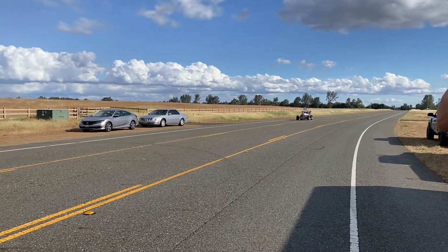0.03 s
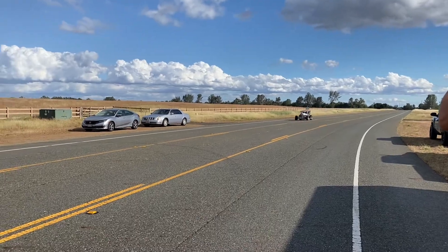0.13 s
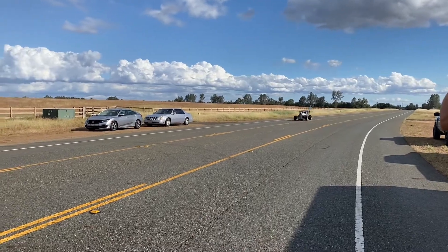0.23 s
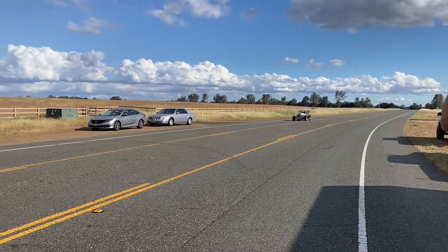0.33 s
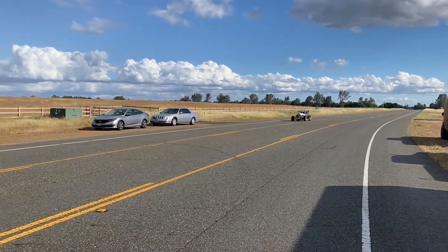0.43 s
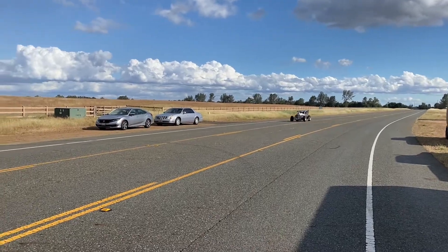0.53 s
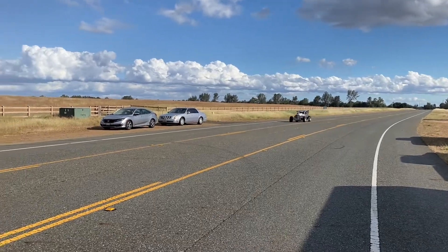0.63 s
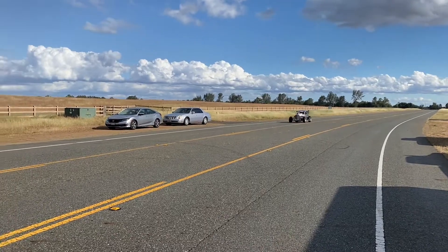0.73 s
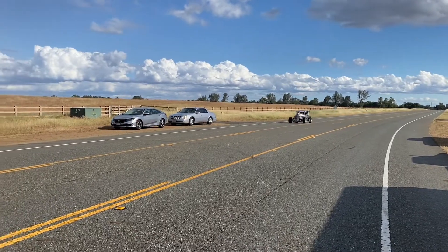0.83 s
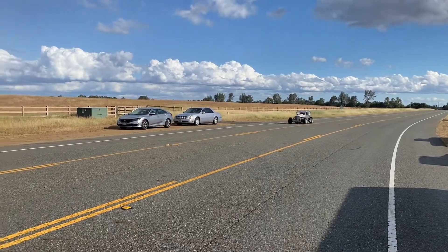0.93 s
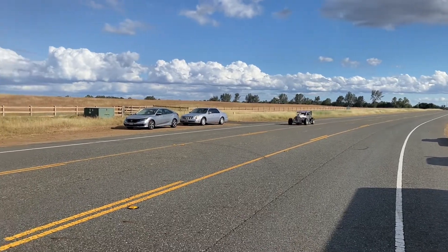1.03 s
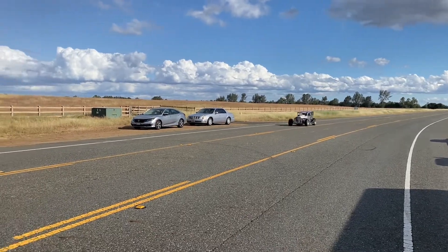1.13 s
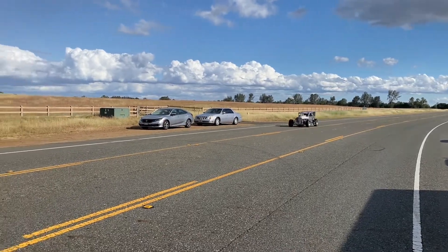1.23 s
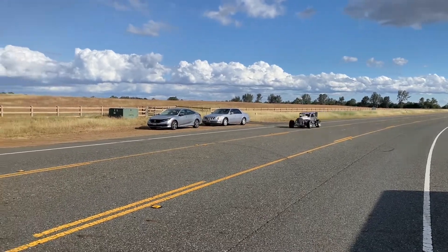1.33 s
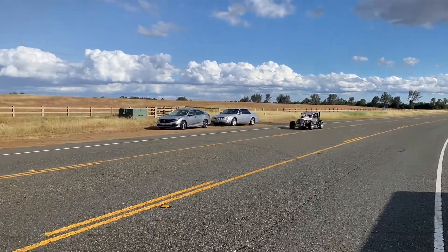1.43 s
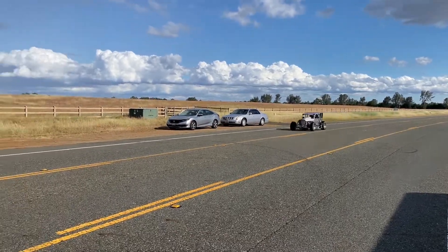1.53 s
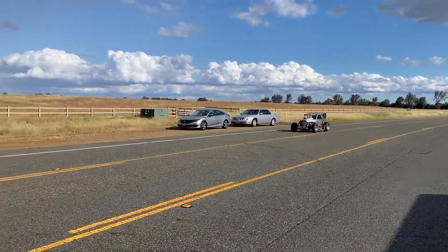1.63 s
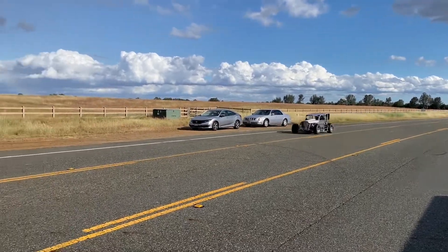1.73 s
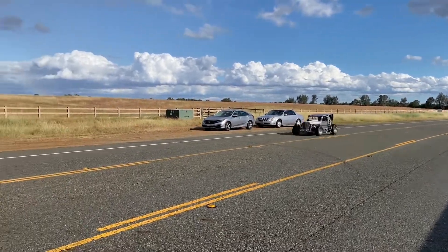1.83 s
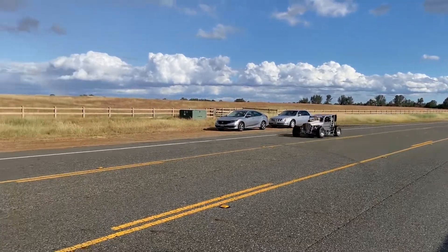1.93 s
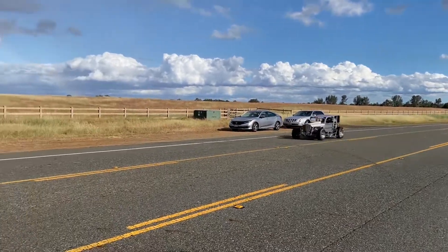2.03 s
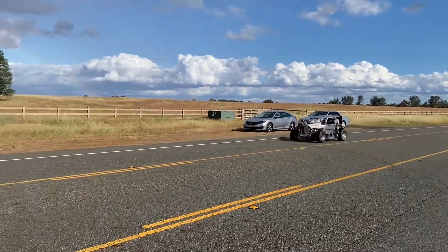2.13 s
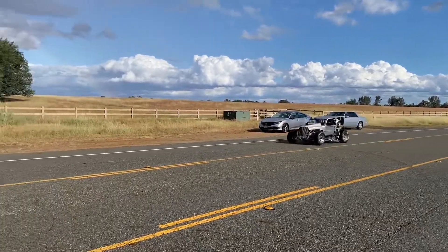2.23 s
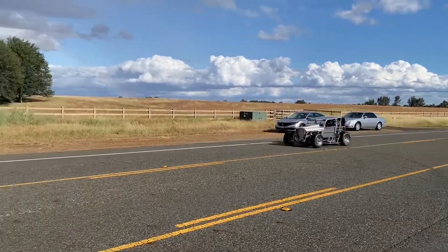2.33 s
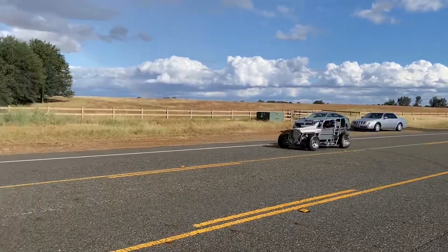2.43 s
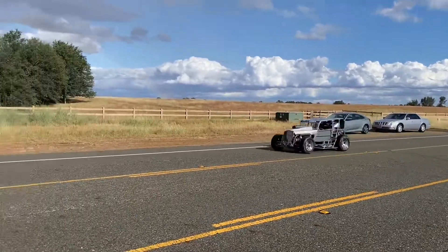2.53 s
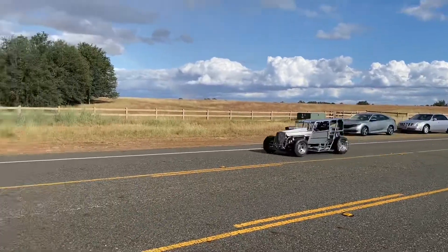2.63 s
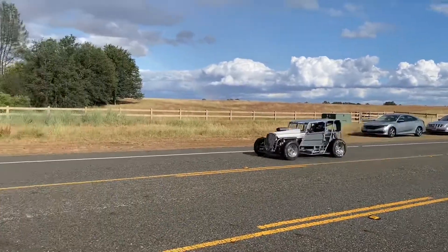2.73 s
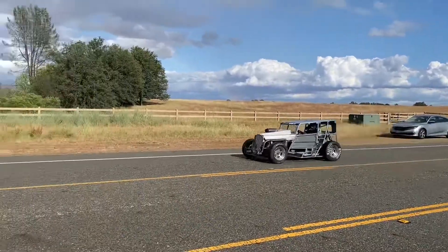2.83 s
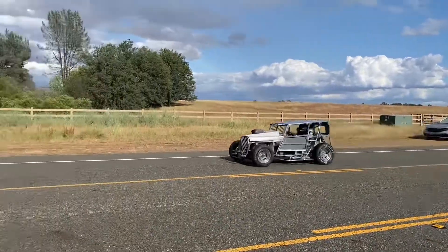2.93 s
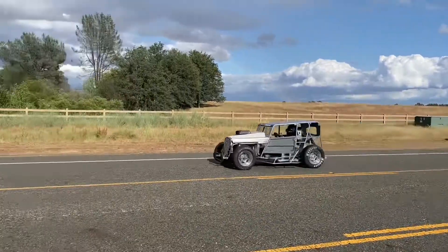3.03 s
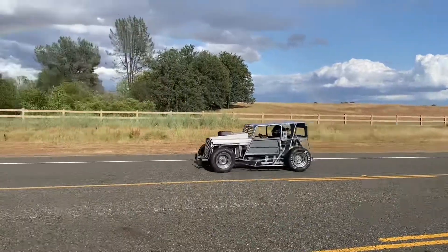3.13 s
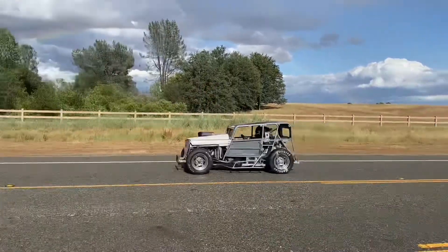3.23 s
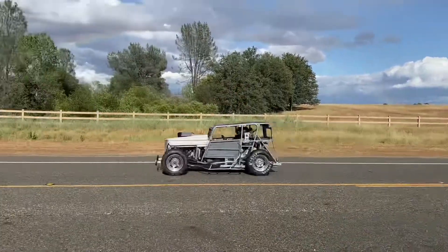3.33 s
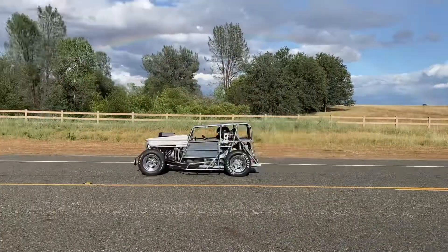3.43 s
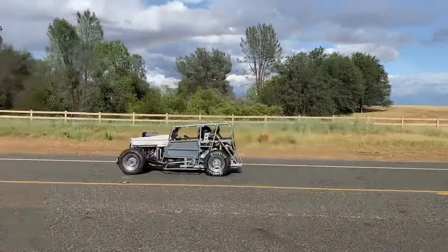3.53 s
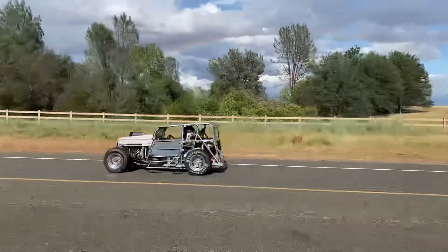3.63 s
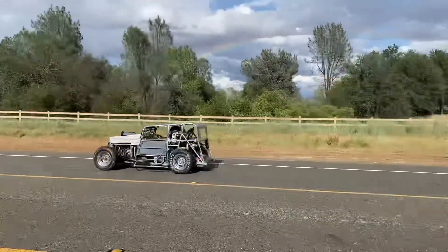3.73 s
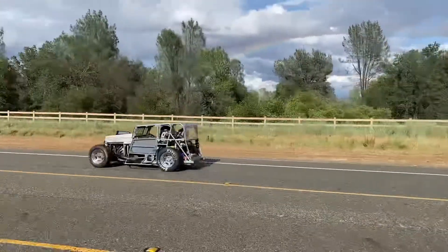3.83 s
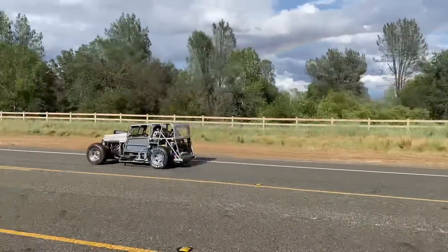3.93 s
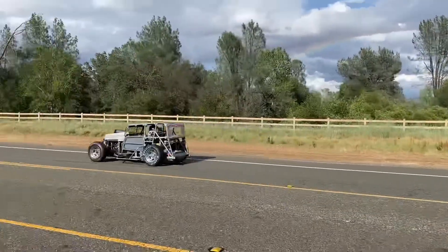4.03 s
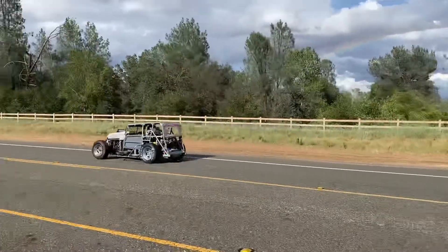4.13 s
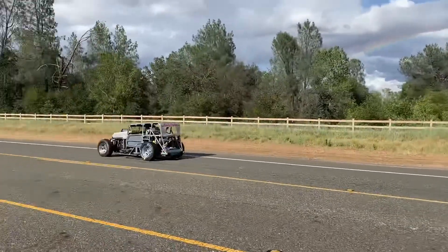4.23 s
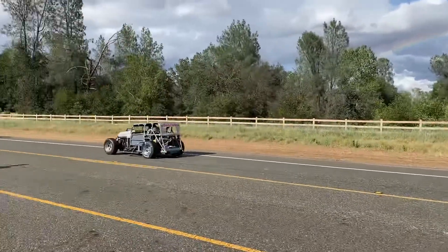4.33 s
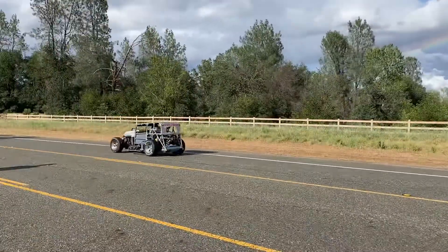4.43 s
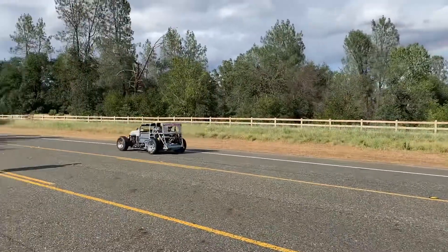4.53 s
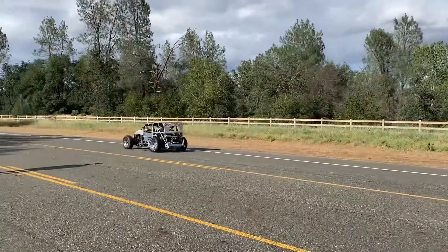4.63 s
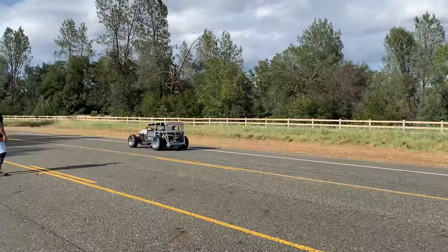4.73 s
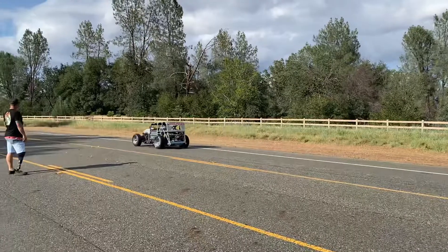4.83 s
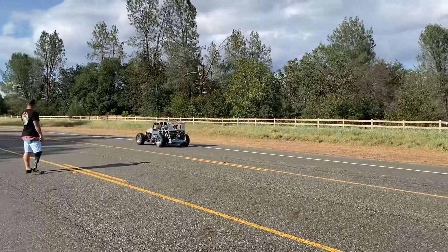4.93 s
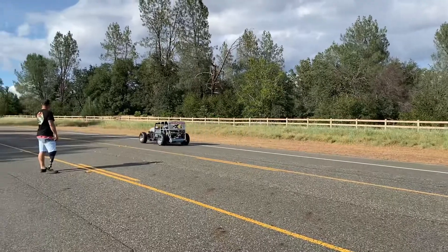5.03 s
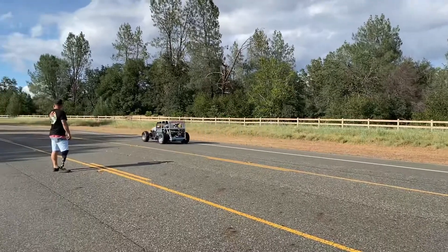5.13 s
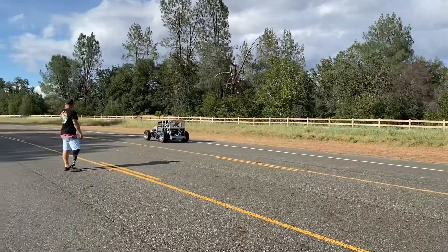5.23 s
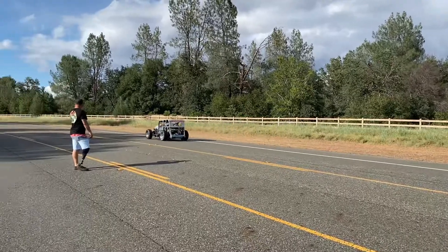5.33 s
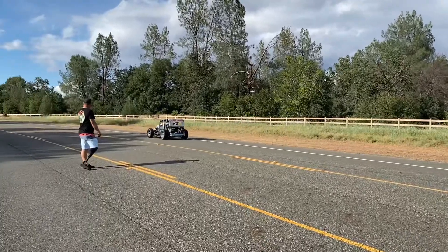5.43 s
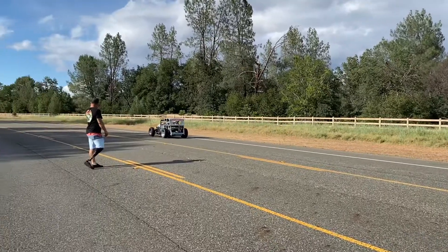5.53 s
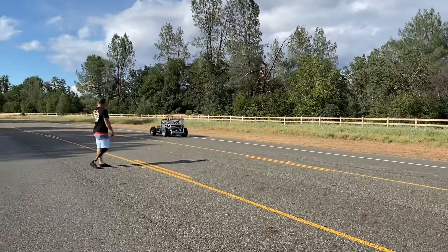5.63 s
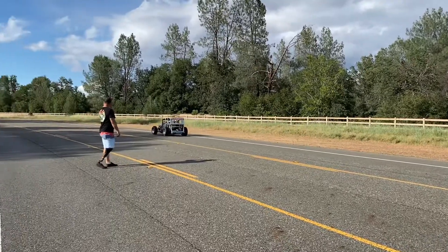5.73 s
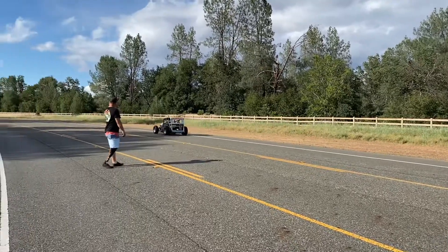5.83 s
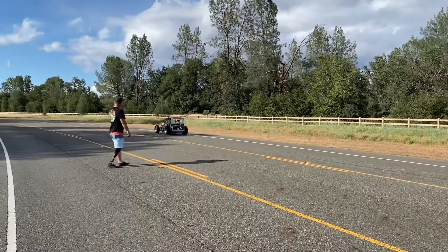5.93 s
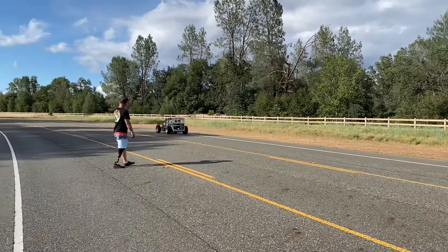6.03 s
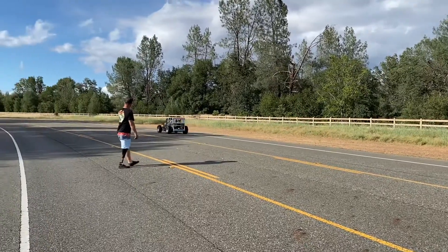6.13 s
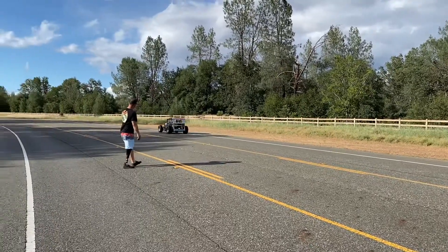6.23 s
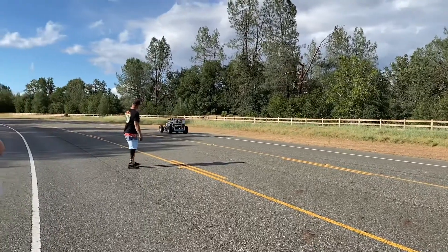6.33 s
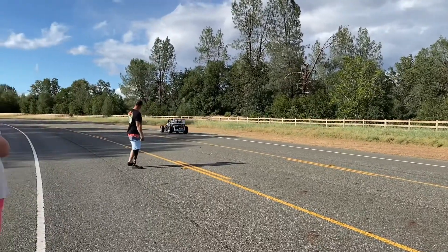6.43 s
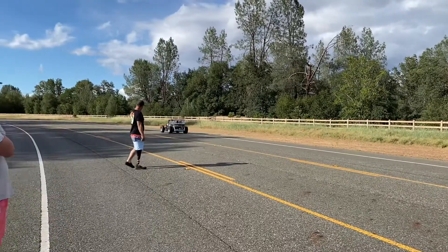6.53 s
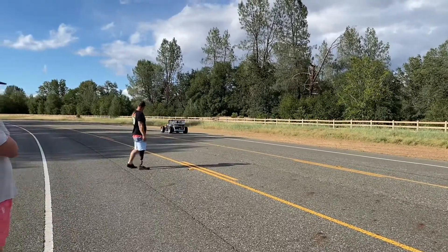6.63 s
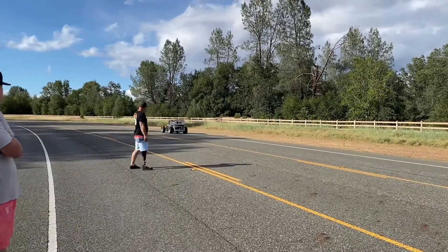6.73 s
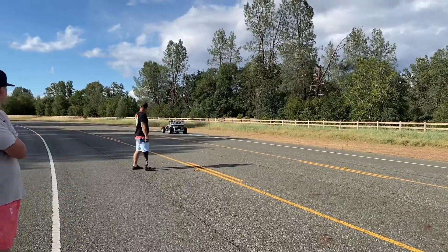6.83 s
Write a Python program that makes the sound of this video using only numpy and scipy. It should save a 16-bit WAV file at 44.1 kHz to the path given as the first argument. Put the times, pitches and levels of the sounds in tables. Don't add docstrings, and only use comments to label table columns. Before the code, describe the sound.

From 0 to 2.3 s a small four-cylinder race car approaches on an open country road, its smooth buzzing note sliding steadily down from a medium-low pitch, with ringing pipe rasp, valve rattle, intake whistle and gas hiss growing stronger. Wind thumps the phone microphone near 1.8 to 2.1 s. At about 2.37 to 2.65 s a gear change stutters with a tight volley of backfires and a brief pipe howl. The car passes and recedes from 2.7 to 4.7 s, throaty and still falling in pitch. Around 4.8 to 5.3 s the revs collapse into low burbling with tiny pops; near 5.3 to 5.85 s it is almost quiet, with thin falling gear whine and tyre rumble. At 5.9 s the engine blips up and holds. A loud bang at 6.28 s momentarily cuts it, followed by stumbling, scuffs and scattered pops until 6.9 s, with dull tree echo.

```python
import sys
import numpy as np
from scipy import signal
from scipy.fft import rfft, irfft
from scipy.io import wavfile
from scipy.ndimage import uniform_filter1d

SR = 44100
rng = np.random.default_rng(int(sys.argv[2]) if len(sys.argv) > 2 else 0)


def nominal_scale(level):
    x = np.asarray(level, float) / 20
    return 10 ** x


def waveform_to_disk(signal):
    frames = np.transpose(np.atleast_2d(signal))
    scaled = np.clip(frames, -1, 1) * 32767
    samples = np.round(scaled).astype(np.int16)
    wavfile.write(sys.argv[1], SR, samples)


N = 303408
TIME = np.arange(N) / SR
COARSE = 32


def curves(table):
    s, *columns = np.transpose(table)
    return [np.interp(TIME, s, column) for column in columns]


def unit(x):
    return x / np.sqrt(np.mean(x ** 2))


def steady(x):
    return x / np.sqrt(uniform_filter1d(x ** 2, size=SR // 3) + 1e-12)


def stack(*db):
    return 10 * np.log10(sum(nominal_scale(d) ** 2 for d in db))


def walk(rate):
    hold = int(SR / rate / 64) + 1
    steps = np.repeat(rng.standard_normal(N // 64 // hold + 2), hold)
    slewed = uniform_filter1d(uniform_filter1d(steps, hold), hold)
    return unit(np.interp(np.arange(N) / 64, np.arange(len(slewed)), slewed))


def coloured(points, ports=((0, 0), (1, 0))):
    hz, db = np.transpose(points)
    bins = np.fft.rfftfreq(N, 1 / SR) + 1
    shape = rfft(rng.standard_normal(N)) * nominal_scale(np.interp(np.log(bins), np.log(hz), db))
    lead = np.pi * np.interp(bins, *np.transpose(ports))
    pair = irfft(shape * np.array([np.cos(lead), 1j * np.sin(lead)]), N)
    return pair / np.sqrt(np.mean(pair ** 2) * 2)


def ring(x, modes):
    out = 0
    for k, (hz, width_hz, db) in enumerate(modes):
        b, a = signal.iirpeak(hz, hz / (1.32 * max(width_hz, 20)), SR)
        twice = signal.lfilter(b, a, signal.lfilter(b, a, x))
        out = out + (-1) ** k * nominal_scale(db) * twice
    return out


VIEW_S = (0.61, 2.15, 4)


def lines(table, turns, flutter_db, slip, view_s=VIEW_S):
    out = 0
    for order, *view_db in table:
        db = np.interp(TIME[::COARSE], view_s, view_db) + flutter_db * walk(7)[::COARSE]
        angle = 2 * np.pi * (order * turns % 1 + rng.random()) + slip * order * walk(30)
        out = out + np.repeat(nominal_scale(db), COARSE)[:N] * np.cos(angle.astype(np.float32))
    return np.sqrt(2) * out


# time in seconds, rate in Hz.
REVS = [(0.0, 183.6), (0.98, 163), (1.4, 153.2), (2.36, 134.6), (2.55, 139.3), (2.61, 128.8), (3.1, 125.5),
        (3.25, 122), (3.64, 113.1), (3.96, 108.7), (4.3, 104), (4.75, 98), (4.83, 86.1), (4.92, 67),
        (4.97, 60), (5.06, 44.5), (5.165, 32.6), (5.3, 28.7), (5.8, 40), (5.86, 43.46), (5.916, 57),
        (5.99, 88.1), (6.02, 90), (6.3, 90.56), (6.44, 83), (6.7, 83), (6.88, 79.9)]
# start in seconds, swing in Hz, swings per
# second, decay in seconds, third order in dB per Hz of swing.
SURGES = [
    (2.615, -8, 6.6, 0.21, -0.5),
    (2.668, .5, 7.7, .3, 13),
    (6.01, 6, 5.4, 0.14, 0),
    (6.421, -8.5, 4.6, 0.45, 0.4),
]


def revs():
    hz, third_db = curves(REVS)[0], 0
    for s, swing_hz, rate, decay, db_per_hz in SURGES:
        t = np.maximum(TIME - s, 0)
        swing = swing_hz * np.exp(-t / decay) * np.sin(2 * np.pi * rate * t)
        hz = hz + swing
        third_db = third_db + db_per_hz * swing
    return hz, third_db


# time in seconds, firing tone in dB, roar in dB, gas flow in dB.
LOAD = [(0.0, -16.5, -28.5, -41), (0.9, -15, -28, -35), (1.8, -12.5, -24, -33.5), (2.12, -17.5, -24, -35),
        (2.35, -16.5, -22, -35), (2.68, -15, -26.5, -40), (3.2, -11, -28, -35.5), (3.64, -12.5, -28, -36.5),
        (4.3, -15.5, -26.5, -42), (4.74, -16, -29.5, -43), (4.87, -17.5, -35, -48), (4.97, -21, -51, -52),
        (5.07, -26.5, -42.5, -54), (5.2, -30, -47, -64), (5.3, -45, -44, -62), (5.65, -61, -67, -71),
        (5.82, -48, -56, -62.5), (5.86, -33, -53, -59), (5.9, -32.5, -53, -57), (5.955, -24.5, -53, -56),
        (5.99, -19.5, -46, -52), (6.27, -17, -41, -51.5), (6.88, -19.5, -58, -54.5)]
# order, dB re firing tone when far, middle, closing, near.
ORDERS_FRONT = [(2, -3.5, -7, -7, 4), (3, -24, -36, -19.5, -12), (4, -20, -22.5, -18, -14),
                (5, -50, -50, -45, -31)]
# order, dB re firing tone when abreast, leaving, gone, lifting, sagging,
# coasting, picking up, blipped, fading.
ORDERS_REAR = [(2, -10.5, 0, -7, -23, -6, -2, -3.5, -18.5, -18),
               (3, -9, -5.5, -6.5, -7, -22, -13, -16, -8, -15.5),
               (4, -28, -27, -15, -14, -7.5, -22, -8, -13, -19),
               (5, -27, -30.5, -15, -17, -24, -14, -25, -23, -28)]
ORDER_VIEW_S = (.2, 1.1, 1.85, 2.12, 2.95, 3.64, 4.73, 4.87, 4.96, 5.1, 5.9, 6.05, 6.7)
INTAKE_VIEW_DB = (-12, -23, -0.5, 2, -9, -16, -7, -6, -8, -7, -8, -16, -11)
# start in seconds, length in seconds, loss in dB, half order in dB re firing tone.
MISFIRES = [
    (2.367, 0.041, -6, 6),
    (2.42, 0.16, -2, -4),
    (2.584, 0.07, -8.5, -9),
    (6.3, 0.18, -12.5, -30),
    (6.542, .04, -3, -28),
    (6.647, 0.042, -1, -28),
]
# start in seconds,
# hold in seconds, roar in dB, hiss in dB.
FLARES = [
    (2.369, 0.0047, -12, -33),
    (2.427, 0.011, -11.5, -38),
    (2.479, 0.085, -18, -40),
    (2.586, 0.034, -23, -55),
    (4.99, .008, -35, -53),
    (5.225, 0.039, -41, -55),
    (6.275, 0.014, -17, -32),
    (6.362, .03, -57, -55),
    (6.437, 0.16, -41.5, -54.5),
    (6.714, .005, -34, -51),
]


def levels():
    t = TIME[::COARSE]
    tone_db, roar_db, flow_db = (curve[::COARSE] for curve in curves(LOAD))
    even_half_db = -29

    def view(db):
        return np.interp(t, ORDER_VIEW_S, db)

    loss_db, half_db = 0, even_half_db
    for s, length, lost_db, odd_db in MISFIRES:
        edge_s = 0.027
        out = np.clip(np.minimum(t - s, s + length - t) / edge_s + .5, 0, 1)
        loss_db = loss_db + out * lost_db
        half_db = half_db + out * (odd_db - even_half_db)

    s, hold, *peak_db = np.transpose(FLARES)[:, :, None]
    rise, fall = 2500, 1300
    away_db = np.maximum(rise * (s - t), fall * (t - s - hold)).clip(0, 90)
    flare_db, hiss_db = (np.max(db - away_db, axis=0) for db in peak_db)

    firing_db = tone_db + loss_db
    roar_db = roar_db + loss_db
    upper_db = []
    for front, back in zip(ORDERS_FRONT, ORDERS_REAR):
        upper_db.append(stack(firing_db + view(front[1:] + back[1:]), flare_db - 7.5))
    *upper_db, fifth_db = upper_db
    rasp_db = stack(roar_db, flare_db)
    intake_db = stack(roar_db + view(INTAKE_VIEW_DB), flare_db - 7)
    gas_db = stack(flow_db + 0.29 * loss_db, hiss_db)
    layers = [firing_db, *upper_db, tone_db + half_db, fifth_db, rasp_db, intake_db, gas_db]
    return [np.interp(TIME, t, db) for db in layers]


# order, dB re firing tone far nose-on,
# near nose-on, tail-on.
UNEVEN = [(0.75, -22, -21.5, -23.5), (1.25, -23, -10, -19), (1.5, -39, -24, -27.5), (1.75, -27, -26, -36),
          (2.25, -27.5, -22, -30.5), (2.5, -39.5, -13.5, -26.5), (2.75, -32, -23, -24),
          (3.25, -38, -38, -21.5), (3.5, -26.5, -47, -39), (3.75, -34, -33, -29)]


def tones(turns, rear, *order_db):
    lean = .1 + .3 * rear
    out = 0
    for order, db in zip((1, 2, 3, 4, .5, 5), order_db):
        angle = 2 * np.pi * order * turns + order * lean * (order > 1) + 0.082 * order * walk(50)
        out = out + np.sqrt(2) * nominal_scale(db + 0.67 * walk(40)) * np.cos(angle)
    burble_db = 5 * np.exp(-((TIME - 5.05) / .2) ** 2)
    stumble = ring(rng.standard_normal(N), [(120, 60, -4.0), (310, 290, 10.5)]) * nominal_scale(burble_db)
    between = lines(UNEVEN, turns, 1.8, 0.086) + nominal_scale(-22.0) * unit(stumble)
    out = out + nominal_scale(order_db[0]) * between
    return signal.sosfiltfilt(signal.butter(2, 59, "high", fs=SR, output="sos"), out)


CYLINDER_DB = [0.82, 0, -0.39, -1.4]
CYLINDER_LATE = [-0.0023, 0.033, -0.022, 0.02]


def firings(turns, rear):
    k = np.arange(1, int(turns[-1]))
    chance = rng.standard_normal((N // 100, 2))[:len(k)].T
    loose = np.interp(k, turns, rear)
    late = np.array(CYLINDER_LATE)[k % 4] + (0.017 + 0.023 * loose) * chance[0]
    size = nominal_scale(np.array(CYLINDER_DB)[k % 4] + (1.0 + 0.64 * loose) * chance[1])
    place = np.interp(k + late, turns, np.arange(N - 0.))
    whole = np.minimum(place.astype(int), N - 2)
    clicks = np.zeros(N)
    clicks[whole] = size * (1 - place + whole)
    clicks[whole + 1] = size * (place - whole)
    return clicks


def clatter(turns, slip):
    place = ((turns + slip * walk(25)) / 4 % 1) * 256
    out = 0
    for pattern in rng.standard_normal((3, 256)):
        out = out + nominal_scale(6 * walk(2.5)) * np.interp(place, np.arange(256), pattern, period=256)
    return out


# Hz, width in Hz, level in dB.
PIPE_FRONT = [(716, 156, 5.5), (998, 190, -2), (1213, 160, -3)]
# Hz, width in Hz, level in dB.
PIPE_REAR = [(692.7, 300, -2), (964, 160, 2.5), (1230, 560, -12)]
# order, dB re pipe rasp when far, middle, closing, near.
UPPER = [(4.25, -1, -8, -17, -27), (4.75, -19, -23, -6.5, -12), (5.0, -5.5, -23, -17, -9.5),
         (5.25, -16, -14, -12, -29), (5.75, -13, -30, -25, -25), (6.0, -21.5, -10, -17, -13),
         (6.25, -26, -7, -17, -18.5), (6.5, -31, -31, -29, -15), (7.0, -21.5, -17, -19, -23),
         (7.25, -14, -11, -25, -31), (8.25, -17.5, -21, -11.5, -15.5), (8.5, -35, -29, -11, -13.5),
         (8.75, -39, -23, -34, -19), (9.0, -38, -35, -18, -25), (9.25, -16, -25, -21, -22),
         (10.0, -32, -35, -41, -22.5), (10.25, -14, -22.5, -32, -25), (10.75, -29, -17, -26, -31),
         (11.0, -36, -20, -19, -34), (11.25, -35, -9, -14, -24), (11.75, -23, -38, -30, -37),
         (12.25, -16, -19, -24, -17), (12.5, -38, -25, -37, -17), (13.0, -35, -27, -29, -16)]
# order, dB re pipe rasp when abreast, turning, leaving, gone.
UPPER_REAR = [(4.25, -21, -21, -13, -14), (5.0, -17, -6.5, -23, -9.5), (6.25, -18, -6, -9, -21),
              (6.5, -30, -15, -9, -26), (7.0, -27, -7, -13, -13), (7.25, -13.5, -10, -15, -15.5),
              (8.0, -26, -11, -12.5, -16), (8.25, -23, -18, -10, -18), (8.5, -27, -25, -9, -19),
              (8.75, -32, -13, -12.5, -24), (9.0, -15, -19, -13.5, -8.5), (9.5, -32, -25, -13.5, -14),
              (10.0, -14, -21, -29, -7.5), (10.25, -30, -25, -30, -14.5), (10.5, -25, -34, -29, -12),
              (12.25, -35, -23, -21, -41)]
UPPER_S = (.26, .75, 1.25, 1.9)
UPPER_REAR_S = (2.88, 3.28, 3.75, 4.4)
SWAP_S = (2.36, 2.62)
# moments in seconds, then levels in dB.
THROAT_S = (3.0, 3.45, 4.2, 4.84, 4.92, 5.95, 6.05)
THROAT_DB = (-20, -4, -2, -1, -14, -14, 1)
# order, dB re pipe rasp far nose-on,
# near nose-on, tail-on.
VALVES = [(15.25, -25, -29, -23), (18.2, -25.5, -29, -34), (25.55, -31, -38, -44)]
# Hz, width in Hz, level in dB.
CLATTER = [(1870, 160, 6), (2650, 300, -3), (3080, 200, -1), (3790, 120, -2), (1050, 140, 9),
           (1300, 120, 3)]


def pipe_rasp(turns, rear, drive):
    swap = np.interp(TIME, SWAP_S, (0, 1))
    slip = .065 + .03 * np.exp(-(TIME - 2.1) ** 2)
    front = (1 - swap) * lines(UPPER, turns, 3, slip, UPPER_S)
    front = signal.sosfilt(signal.butter(6, 2120, fs=SR, output="sos"), front)
    front = front + ring(front, [(1840, 130, -3)])
    rear_table = UPPER_REAR + [(9.25, -30, -25, -22, -13), (7.5, -25, -22, -18, -26)]
    behind = swap * lines(rear_table, turns, 3, .065, UPPER_REAR_S)
    behind = behind + ring(behind, [(990, 160, -3)])
    behind = signal.sosfilt(signal.butter(6, 1075, fs=SR, output="sos"), behind)

    rough = (1 - rear) * unit(ring(drive, PIPE_FRONT)) + rear * unit(ring(drive, PIPE_REAR))
    throat = nominal_scale(np.interp(TIME, THROAT_S, THROAT_DB)) * steady(ring(drive, [(975, 170, 0)]))
    valves = lines(VALVES, turns, 3.4, .025)
    rattle = (1 - swap) ** 2 * nominal_scale(-10.5) * steady(ring(clatter(turns, .006), CLATTER))
    burr = rear * nominal_scale(-14) * steady(ring(clatter(turns, .03), [(780, 260, -5), (980, 200, 0)]))
    return front + behind + nominal_scale(-6.5) * steady(rough) + throat + valves + rattle + burr


# Hz, width in Hz, level in dB.
INTAKE = [(1872, 190, 9.5), (2210, 250, -15), (1540, 430, -5), (3180, 260, -6.5), (3830, 81, -20)]


def intake_ring(drive, rear, intake_db):
    return nominal_scale(intake_db - 7.5 - 6.1 * rear + 0.68 * walk(9.26)) * steady(ring(drive, INTAKE))


# Hz, dB per Hz.
GAS_FRONT = [(700, -12), (1300, -9.5), (1850, -4.5), (2300, -10), (3100, -10), (5500, -18.5), (7100, -13),
             (9000, -19), (11000, -19.5), (13000, -27), (16000, -47)]
GAS_REAR = [(700, -36), (1300, -0.5), (1980, -3.5), (2300, -8), (3600, -7), (6400, -13.5), (9000, -18),
            (11000, -19.5), (13000, -26), (14000, -25), (15200, -24), (15800, -27), (16200, -50)]
# Hz, turns the left leads.
PORTS_FRONT = [(0, 0), (4300, -.04), (5500, .33), (7100, 0), (14800, -2.0)]
PORTS_REAR = [(0, 0), (2400, .1), (3600, 0), (5300, .15), (7100, 0), (14800, -2.0)]
# Hz, width in Hz, level in dB, loudest moment in seconds, span in seconds.
AIRBOX = [(2700, 110, 5, 1.55, .35), (3080, 130, 4, .9, .5), (3150, 250, 4, 1.95, .35),
          (3780, 90, 8, 1.2, .45), (4250, 120, 4, .7, .3), (3300, 200, 7, 2.52, .07),
          (5250, 450, 3, 1.9, .5), (2050, 120, 3, 3.1, .4), (2550, 120, 3, 3.2, .4),
          (1700, 130, 4, 4.0, .5), (3700, 130, 3, 4.2, .5)]


def gas_hiss(puff, rear, gas_db):
    level = nominal_scale(gas_db + 3.5 + 1.0 * walk(18)) * unit(puff)
    front = np.sqrt(1 - rear) * coloured(GAS_FRONT, PORTS_FRONT)
    behind = np.sqrt(rear) * coloured(GAS_REAR, PORTS_REAR)
    mid, side = level * (front + behind)
    late = np.roll(mid, shift=900)
    for *mode, s, span in AIRBOX:
        mid = mid + np.exp(-((TIME - s) / span) ** 2) * ring(late, [mode])
    stray = nominal_scale(-9.5) * level * coloured(GAS_REAR)[0]
    return mid, side + 0.12 * mid + stray


TURN_S = (2.14, 3.2)
# time in seconds, left minus right in dB.
PAN = [(0, -0.2), (1.7, -2.26), (2.6, 2), (3.6, -0.5), (6.88, 0.2)]
CUT_S = (6.262, 6.275, 6.3, 6.312)


def engine():
    hz, third_db = revs()
    *order_db, rasp_db, intake_db, gas_db = levels()
    order_db[2] = order_db[2] + third_db
    rear = np.interp(TIME, TURN_S, (0, 1))
    turns = np.cumsum(hz * (1 + .0035 * rear * walk(11))) / SR
    puff = 1.65 + np.exp(-(turns % 1) / 1.0)
    drive = unit(firings(turns, rear)) + (0.25 + 0.081 * rear) * puff * rng.standard_normal(N)

    low = tones(turns, rear, *order_db)
    upper = nominal_scale(rasp_db) * pipe_rasp(turns, rear, drive) + intake_ring(drive, rear, intake_db)
    gas_mid, gas_side = gas_hiss(puff, rear, gas_db)

    near = nominal_scale(np.interp(TIME, (0, 2.1, 3.4), (-3, 3, -3)))
    port_gap = 0.15 * (upper - np.roll(upper, shift=6))
    bounced = 0.52 * np.roll(upper, shift=310)
    bounced_low = 0.35 * np.roll(ring(low, [(382, 186, 0)]), shift=170)
    apart = 0.024 * upper + near * (port_gap + bounced + bounced_low)
    panned = np.tanh(curves(PAN)[0] * np.log(10) / 40) * low + 0.022 * np.roll(low, shift=90)
    both = np.array([low + upper + gas_mid, gas_side + apart + panned])
    return both * np.interp(TIME, CUT_S, (0.97, 0.34, 0.19, 0.98))


# Hz, dB per Hz.
ROAD = [(30, -40), (60, -4), (130, -14), (190, -5), (260, -10), (380, -2), (600, -15.5), (760, -11),
        (1000, -8.5), (1200, -23), (1450, -19), (1900, -27), (2350, -21), (3000, -31), (5000, -33.5),
        (9000, -69), (14000, -70)]


def road():
    swell = nominal_scale(-41.5 + 1.0 * walk(6) + 1.5 * walk(30))
    mid, side = swell * coloured(ROAD, PORTS_REAR)
    return mid, side + nominal_scale(-10.5) * swell * coloured(ROAD)[0]


# time in seconds, peak in dB, fade in dB per second.
GUSTS = [(0.1, -58, 12), (1.82, -30, 170), (1.93, -36, 80), (2.05, -27, 150), (2.2, -40, 60),
         (2.49, -33, 110), (2.75, -38, 80), (3.05, -37, 80), (3.28, -40, 80), (3.73, -40, 80),
         (3.9, -45, 15), (5.06, -44, 150), (5.25, -49, 40), (5.96, -48, 30), (6.29, -42, 118),
         (6.57, -49, 20), (6.88, -45, 100)]


def wind():
    t = TIME[::COARSE]
    calm_db = -60
    each_db = [np.maximum(db - fade * np.abs(t - s), calm_db) for s, db, fade in GUSTS]
    level_db = np.interp(TIME, t, np.max(each_db, axis=0))
    thump = coloured([(10, -30), (25, -11), (55, -1), (85, 2), (150, -29), (400, -77)])[0]
    return nominal_scale(level_db + 4.5 * walk(14)) * thump


# time in seconds, peak in dB, crack in dB re peak, swoop in dB re peak, ring in Hz.
POPS = [(2.367, -6, -16, -11, 304), (2.394, -8, -18, -12, 343), (2.411, -5, -22, -14, 409),
        (2.425, -11, -17, -24, 456), (2.435, -0.5, -24, -15, 310), (2.471, -5.5, -30, -10, 387),
        (2.483, -18, -16, 0, 444), (2.497, -17, -3, 0, 330), (2.512, -20, -3, -4, 330),
        (2.522, -14, -8, -2, 330), (2.541, -16, -8, 2, 330), (2.557, -16, -10, -8, 330),
        (2.58, -14, -25, -4, 374), (2.605, -18, -18, -3, 350), (2.651, -17, -25, -10, 355),
        (4.989, -39, 5, -9, 246.4), (5.146, -44, 6, -9, 307), (5.225, -43, 5, -9, 298),
        (5.371, -33, -10, -4, 377), (5.843, -39, -13, 6, 264.7), (6.269, -10, -30, -28, 304),
        (6.328, -19, -47, -15, 387.4), (6.352, -21, -30, -14, 382), (6.42, -21.5, -22.5, 0, 364.3),
        (6.4735, -13.5, -32.5, -4, 366.4), (6.498, -21, -23, 2, 256), (6.5205, -13, -28, -3, 280.2),
        (6.565, -11.5, -35, -5, 323.8), (6.59, -22, -30, -12, 301.3), (6.686, -25, -30, -12, 264),
        (6.7105, -10.5, -27, -6, 300)]
# time in seconds, peak in dB, crack and swoop in dB re peak, ring in Hz.
BANG = (6.2755, -20, -2, 20.5, 362)
# Hz, width in Hz, level in dB.
BANG_RING = [(790, 290, -17), (2380, 390, -18), (3020, 300, -27), (3680, 280, -31), (5000, 400, -44),
             (6650, 500, -41)]


def backfires():
    out = np.zeros(N + SR)
    t = np.arange(SR // 10) / SR
    angle = 2 * np.pi * np.log(1 + t / 0.000418) / np.log(2.25) + 0.26
    swoop_shape = (1 - np.exp(-t / 0.00073)) * np.exp(-(t / 0.015) ** 2)
    swoop = swoop_shape * (np.cos(angle) + 0.11 * np.cos(3 * angle))
    for s, db, crack_db, swoop_db, hz in POPS + [BANG]:
        bang = 2.53 * (t / 0.0029) * np.exp(-t / 0.0031) * np.sin(2 * np.pi * hz * t)
        grit = uniform_filter1d(uniform_filter1d(rng.standard_normal(len(t)), size=7), size=7)
        snap = np.sin(2 * np.pi * 2400 * t) + 2.1 * np.sin(2 * np.pi * 1050 * t) + 1.7 * grit
        crack = nominal_scale(crack_db + 8) * (t / 0.00055) * np.exp(-t / 0.00052) * snap
        soft = uniform_filter1d(swoop, size=8 if swoop_db > 8 else 40)
        start = int((s + 0.00102) * SR)
        out[start:start + len(t)] += nominal_scale(db) * (bang + nominal_scale(swoop_db) * soft + crack)
    start = int((BANG[0] + 0.00104) * SR)
    out[start:start + len(t)] += nominal_scale(39) * ring(1. * (t == 0), BANG_RING)
    return out[:N]


# time in seconds, Hz, level in dB.
HOWL = [(2.465, 418, -40), (2.485, 421, -16), (2.56, 429, -14), (2.58, 430, -41)]


def howl():
    hz, db = curves(HOWL)
    on = (TIME > HOWL[0][0]) & (TIME < HOWL[-1][0])
    angle = 2 * np.pi * np.cumsum(hz) / SR
    second = nominal_scale(-11 + 4 * walk(90)) * np.cos(2 * angle)
    third = nominal_scale(-19 + 4 * walk(90)) * np.sin(3 * angle + 2.5 * walk(120))
    return on * nominal_scale(db + 6.0 + 2.2 * walk(70)) * (np.sin(angle) + second + third)


def trees(x):
    t = np.arange(SR // 3) / SR
    onset_s, t60_s = 0.022, 0.34
    scatter = (t > onset_s) * rng.standard_normal(len(t)) * nominal_scale(-60 * t / t60_s)
    scatter = signal.lfilter([.15], [1, -.85], scatter)
    return nominal_scale(-24) * signal.fftconvolve(x, scatter / np.sqrt(np.sum(scatter ** 2)))[:N]


# time in seconds, Hz, level in dB.
WHINE = [(5.1, 785, -64), (5.3, 765, -53), (5.5, 741.6, -51), (5.94, 665, -52), (6.0, 655, -62)]
# time in seconds, second and third partial in dB re first.
WHINE_UPPER = [(5.1, -24, -30), (5.45, -14, -30), (5.75, -10, -20), (5.9, -11, -11), (6.0, -11, -14)]


def gears():
    hz, db = curves(WHINE)
    second_db, third_db = curves(WHINE_UPPER)
    angle = 2 * np.pi * np.cumsum(hz * (1 + .007 * walk(45))) / SR
    on = (TIME > WHINE[0][0]) & (TIME < WHINE[-1][0])
    out = 0
    for multiple, rel_db in ((1, 0), (2, second_db), (3, third_db), (.5, -9), (.25, -7)):
        out = out + nominal_scale(rel_db + 2.8 * walk(22)) * np.sin(multiple * angle)
    return on * nominal_scale(db + 4.5) * out


# start in seconds, length in seconds, Hz, level in dB.
SCUFFS = [
    (5.228, .035, 2330, -46),
    (6.36, .03, 2050, -46),
    (6.432, 0.04, 2170, -45),
    (6.475, .04, 2400, -47),
    (6.52, .035, 2300, -48),
]


def scuffs():
    out = np.zeros(N)
    for s, length, hz, db in SCUFFS:
        rub = unit(ring(rng.standard_normal(SR // 5), [(hz, 380, 0)]))
        t = np.arange(len(rub)) / SR
        swell = np.sin(np.pi * np.clip(t / length, 0, 1)) ** .7
        out[int(s * SR):int(s * SR) + len(t)] += nominal_scale(db) * rub * swell
    return out


def scene():
    mid, side = engine()
    road_mid, road_side = road()
    air = wind()
    pops = backfires() + howl()
    mid = mid + pops + trees(pops) + gears() + air + road_mid + scuffs()
    side = side + 0.03 * pops + .15 * np.roll(pops, shift=130)
    side = side + .09 * np.roll(air, shift=3000) + road_side
    return np.array([mid + side, mid - side])


def band_limit(x):
    return signal.sosfilt(signal.butter(12, 15750, fs=SR, output="sos"), x)


def record(dry):
    after = TIME - BANG[0] - .025
    duck_db = -7.5 * np.clip(after / 0.013, 0, 1) * np.exp(-(after / 0.052) ** 2)
    rounded = np.tanh(1.04 * dry * nominal_scale(duck_db)) / 1.04
    return band_limit(rounded)


dry = scene()
out = record(dry)
waveform_to_disk(out)
```